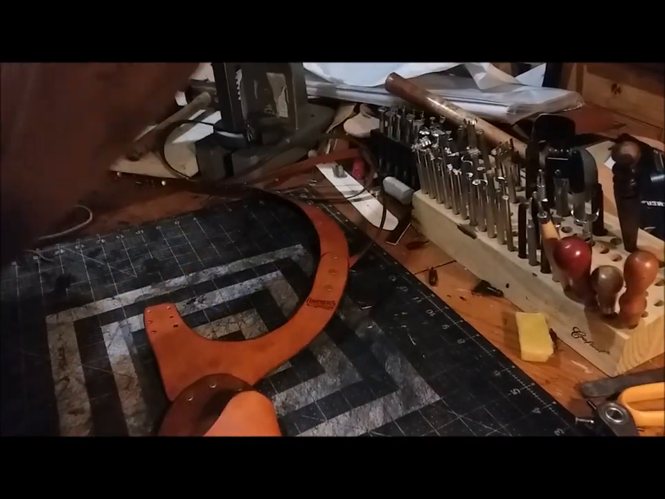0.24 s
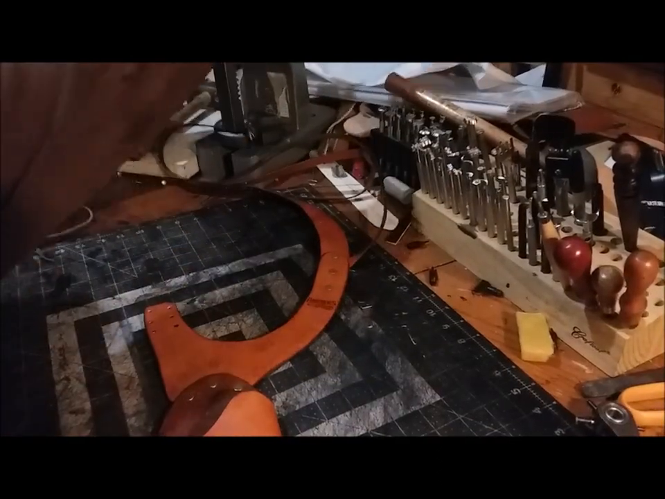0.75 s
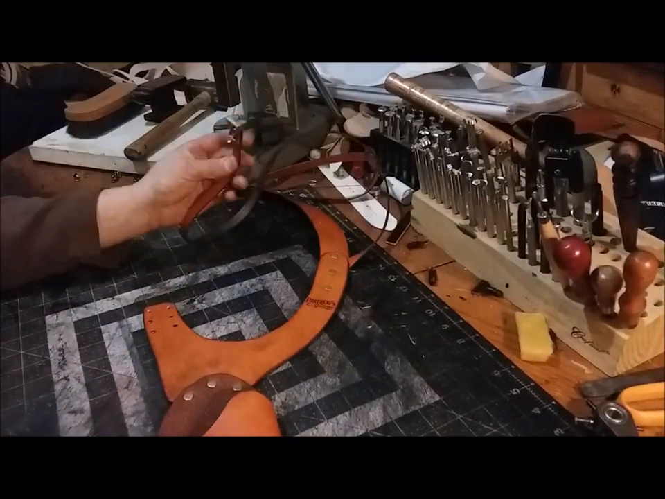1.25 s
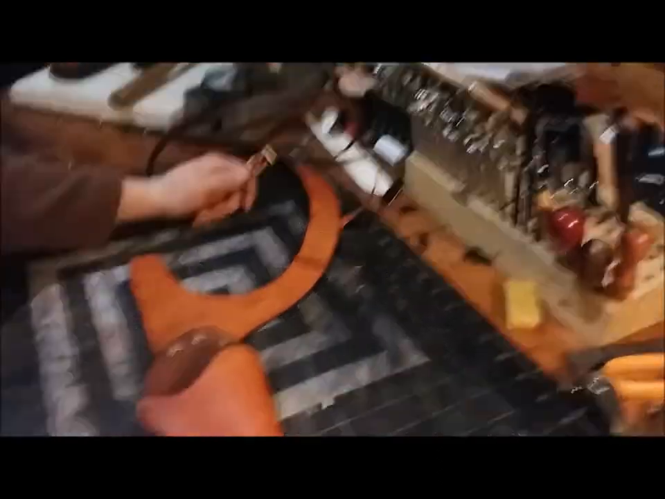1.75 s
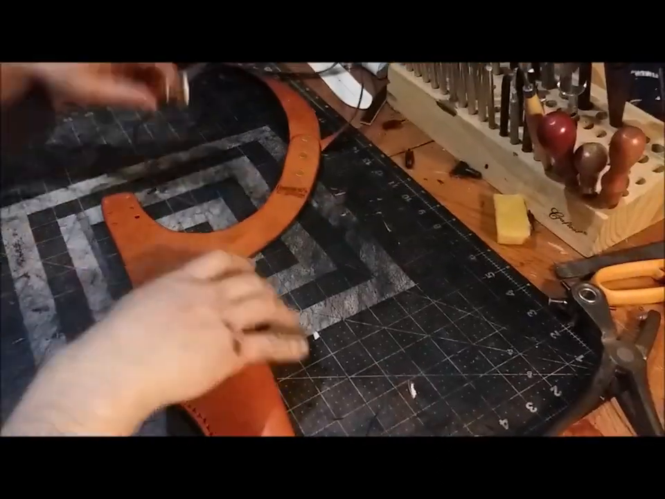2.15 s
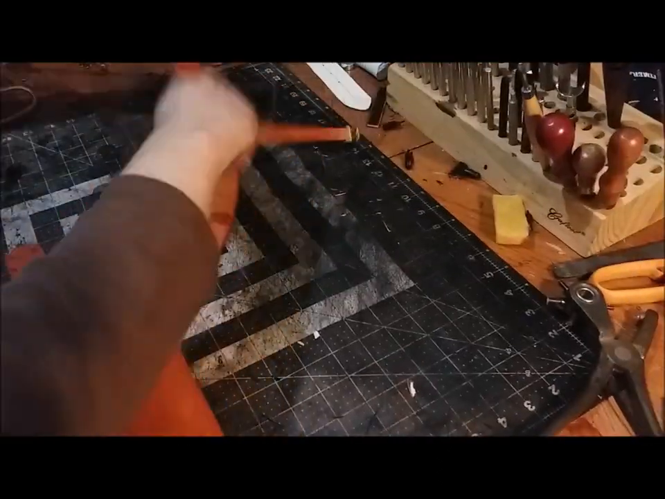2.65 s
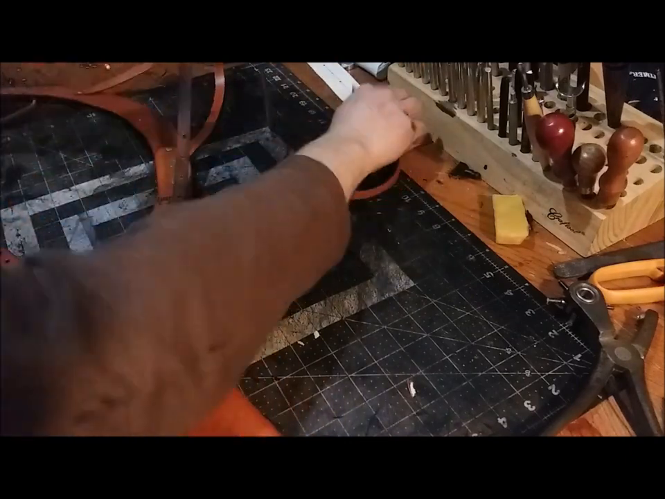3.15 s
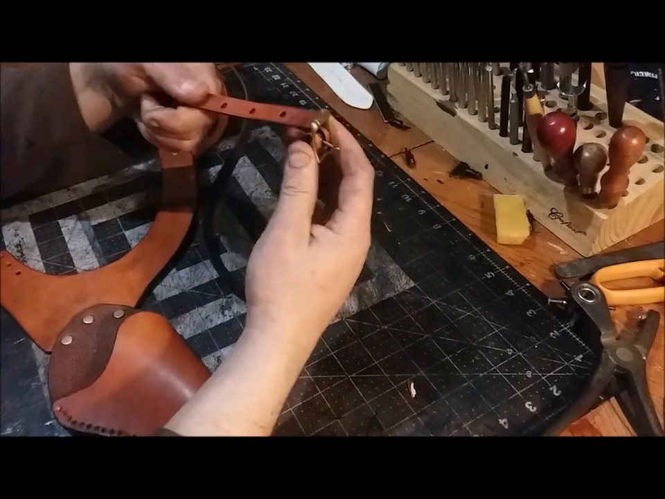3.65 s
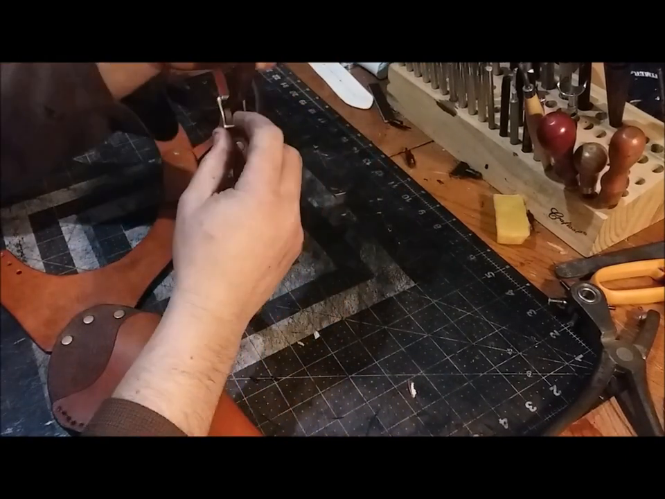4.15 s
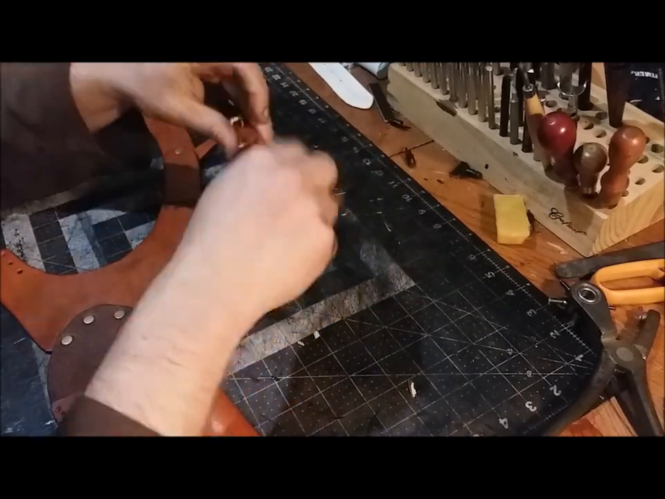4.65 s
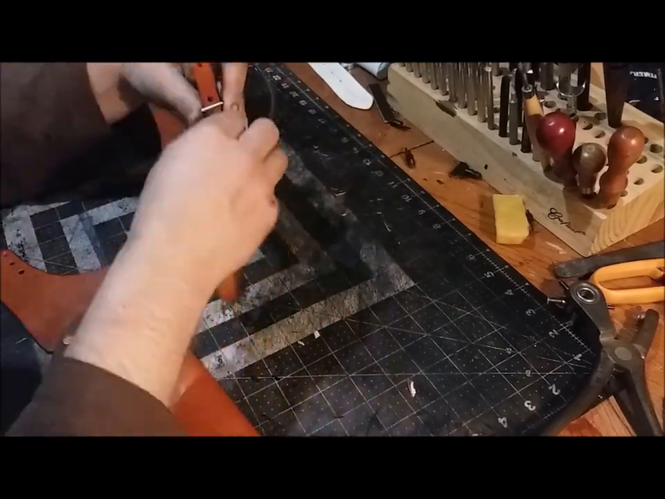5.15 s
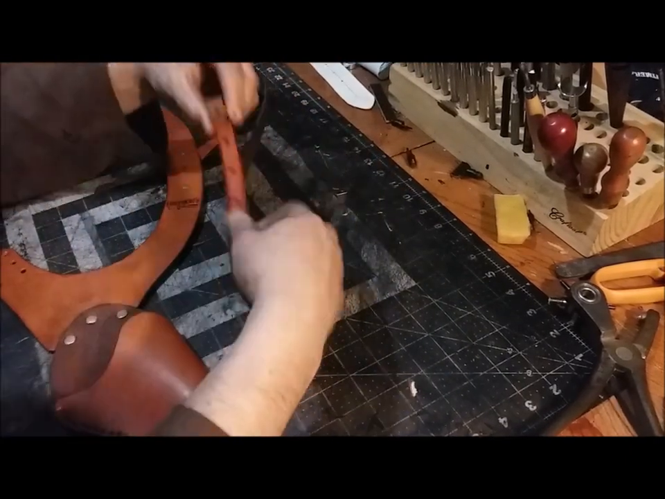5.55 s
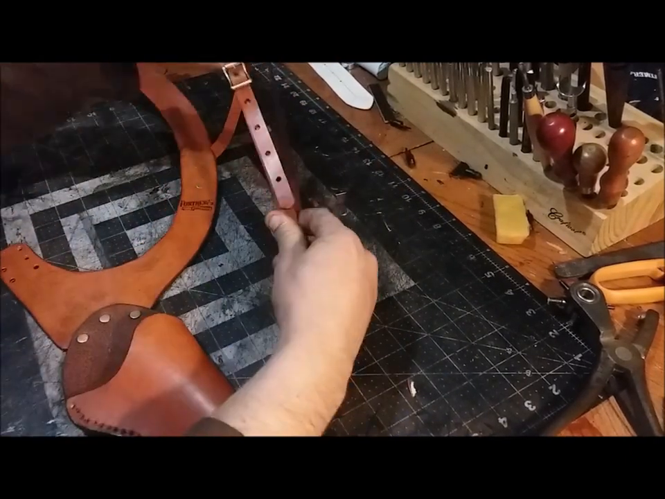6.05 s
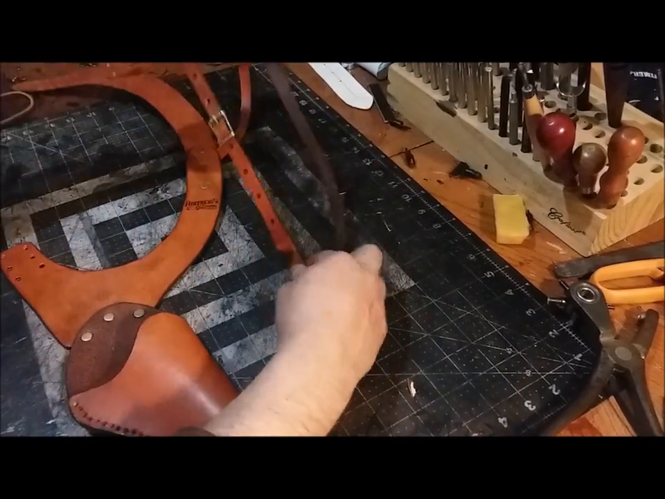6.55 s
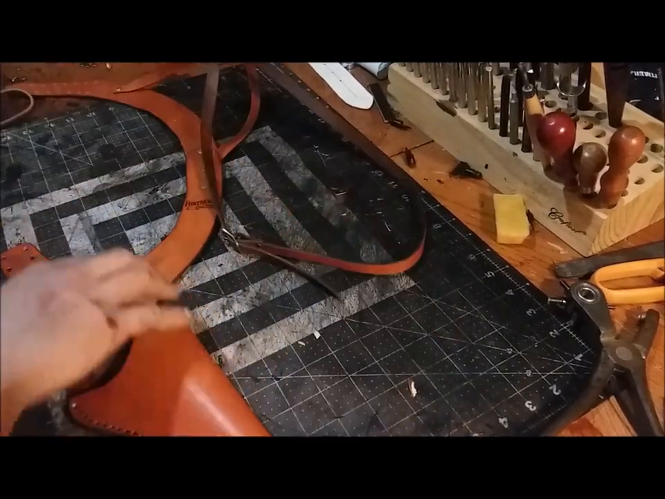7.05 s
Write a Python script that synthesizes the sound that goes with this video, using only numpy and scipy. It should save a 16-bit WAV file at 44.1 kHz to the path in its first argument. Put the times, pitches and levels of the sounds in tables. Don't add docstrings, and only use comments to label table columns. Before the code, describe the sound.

Quick leathercraft handling: scraped hollow hoots, a bright buckle slam, clustered clicks, then quiet strap fiddling and a final crisp double snap.

```python
import sys
import numpy as np
from scipy import signal
from scipy.fft import rfft, irfft, next_fast_len
from scipy.io import wavfile

SR = 44100
rng = np.random.default_rng(int(sys.argv[2]) if len(sys.argv) > 2 else 0)


def level_to_linear(level):
    exponent = np.asarray(level, float) / 20
    return 10 ** exponent


def dump_mix(stems):
    frames = np.atleast_2d(stems).T
    limited = np.clip(frames, -1, 1)
    pcm = np.round(limited * 32767).astype(np.int16)
    wavfile.write(sys.argv[1], SR, pcm)


N = 321930
SPLIT_HZ = 3700

# freq_hz, level_db_rms
HUM_LINES = [(236.9, -74), (516.8, -87.5), (1066, -88)]
# freq_hz, density_db_per_hz
ROOM_TONE = [(20, -14), (100, -13.5), (190, -17), (240, -5.5), (314, -11.5), (380, -8), (583, -10.5),
             (913, -21.5), (1050, -9), (1160, -23.5), (1690, -31), (2660, -26.5), (15200, -37),
             (16500, -54.5)]
# freq_hz, correlation
ROOM_ALIKE = [(60, 0.2), (130, -0.53), (290, 0.99), (640, 0.43), (1410, 0.92), (3100, -1.1), (6820, -0.13),
              (15000, 0.049)]
HANDLING_ALIKE = [(300, 0.36), (900, 0.93), (2500, 0.24), (4000, 0.06), (12000, 0.064)]

# time_s, rumble_db, rub_db, rustle_db
DRAG_LEVELS = [
    (0.0, -58.5, -63.5, -78),
    (2.03, -108.5, -66, -78),
    (2.46, -76, -68.5, -76),
    (7.3, -75, -64, -86.5),
]
# freq_hz, density_db_per_hz
DRAG_TONE = [(140, -42.5), (230, 0), (260, -8.5), (413, -5), (969, -8.5), (1100, -3), (1770, -7),
             (3800, -7.5), (8450, -13), (16000, -19)]

# freq_hz, width_hz, level_db
HOLLOW_MODES = [(1570, 70, 1), (1785, 90, -4), (1910, 90, -3), (2150, 120, -4), (2340, 110, -2),
                (2520, 140, -6.5), (4440, 300, -18), (6560, 300, -17), (10200, 350, -20), (11800, 300, -19)]
# time_s, level_db, half_length_s
STROKES = [
    (.868, -35.5, .017),
    (.897, -43, .012),
    (1.009, -38, .011),
    (1.034, -43, .014),
    (1.08, -57, .025),
    (1.153, -40.5, .013),
]

# freq_hz, level_db, t60_s
FRAME_MODES = [(1100, -22, .06), (2370, 0.5, .06), (4160, -8, .06), (5000, -7.5, .05), (6745, -3, .06),
               (7200, -6, .05), (7720, -8, .09), (8200, -2, .05), (8410, -6, .06), (9760, -8, .05),
               (10680, -6, .05), (11790, -14, .06), (13530, -14, .05)]
# freq_hz, level_db, t60_s
PRONG_MODES = [(4800, 5, .007), (6400, 1, .009), (8300, -8, .016), (9350, -1, .012), (13100, -5, .014),
               (15200, -10, .012)]
# time_s, left_peak_db, left_minus_right_db
PRONG_HITS = [
    (1.7774, -18, 9),
    (1.8012, -12, 22.5),
]

# time_s, peak_db, pitch_hz, left_minus_right_db
PINGS = [(0.0418, -34, 2740, -0.5), (0.0623, -30, 3030, -0.5), (0.1386, -24, 2260, -1.0),
         (0.3701, -46, 3360, 1.5), (0.7736, -24, 2600, -1.0), (0.7886, -29, 1940, 1.0),
         (0.8465, -28, 1860, 0.5), (0.8504, -26, 1580, 1.0), (0.9966, -33, 1560, 0.5),
         (1.0031, -25, 2100, -0.5), (1.0074, -29, 1570, 5), (1.1413, -34, 1690, 4.0),
         (1.1453, -28, 1560, 4), (2.0767, -36, 3640, 2.5), (2.5017, -19, 3580, 1.5),
         (2.5104, -27, 2960, -0.5), (2.576, -41, 3380, 1.5), (2.6125, -38, 3700, -1.0),
         (2.7477, -37, 3410, 2.0), (2.826, -30, 8600, 1.0), (2.8764, -31, 5740, 0.0),
         (2.9128, -24, 3460, 3.5), (2.9174, -25, 3760, -1.5), (2.9394, -25, 4170, -0.5),
         (2.9474, -28, 6300, 0.0), (2.9806, -22, 6910, 0.0), (3.0204, -28, 4960, 0.0),
         (3.1418, -32, 2280, 1.0), (3.1464, -30, 2220, 2.0), (3.1637, -28, 4950, -1.5),
         (3.2645, -45, 3450, 2.0), (3.3154, -24.5, 2390, -2), (3.3214, -22, 3800, -0.5),
         (4.138, -62, 3290, 1.5), (5.6634, -36, 4520, 1), (5.9344, -45, 1370, 1.0),
         (5.9464, -34, 5480, 0.0), (5.9793, -31, 4500, 1.5), (6.2043, -26.5, 4500, 1.5),
         (6.4358, -27, 1500, -1.5), (6.9292, -14, 4570, -2), (6.9344, -14, 5480, 2),
         (6.9671, -31, 1530, -1.0), (6.9774, -32, 4590, 0.0)]
# time_s, peak_db, pitch_hz, left_minus_right_db
TAPS = [(0.611, -42, 425, 0.0), (0.69, -41, 501, 4), (0.714, -43, 480, -0.5), (0.776, -33, 460, 0.0),
        (0.79, -23.5, 445, -3), (1.174, -39, 423, 0.5), (1.333, -33, 413, -0.5), (4.844, -38, 398, 1.5),
        (4.861, -41, 375, 1.5), (4.877, -45, 420, 1), (5.394, -53, 412, 2.0), (5.416, -44, 393, 1.5),
        (5.455, -49, 401, 2), (5.564, -50.5, 417, 0.5), (5.597, -46, 265, 0.5), (5.663, -54, 347, 2.0),
        (5.755, -58, 1070, 2), (5.811, -54, 412, 1.0), (5.854, -56, 417, 0.0), (5.883, -44, 337, -1),
        (5.934, -45, 1120, 0.5), (6.03, -55, 334, -2), (6.054, -50, 424, 0.0), (6.141, -54, 425, 0.0),
        (6.182, -59, 261, -2.0), (6.254, -57, 393, 0.5), (6.344, -61.5, 440, -0.5), (6.935, -32, 431, -0.5),
        (6.971, -44, 388, 0.5), (6.985, -47.5, 269, -1.0), (7.004, -58, 275, -1.0), (7.179, -47.5, 576, -5),
        (7.197, -43.5, 413, -1.0), (7.214, -51, 277, -2.0), (7.264, -48, 1080, -1.5)]

# freq_hz, level_db
BENCH_MODES = [(260, -7.5), (310, -7.5), (360, -4), (420, 0.5), (470, -4.5), (580, -7.5), (730, -17),
               (870, -15)]
# freq_hz, gain_db
HANDLING_DIP = [(20, -2), (110, -2), (165, -8), (240, 0), (16000, 0)]
# time_s, left_minus_right_db
PLACE = [(0, 0), (1.6, 0), (1.72, 1.5), (2.4, 2), (2.47, 1.5), (2.6, 0.5), (3.3, 0.5), (5, -0.5),
         (5.7, 0.5), (6.25, 1), (6.44, 0), (6.9, 0), (7.3, .5)]

# freq_hz, density_db_per_hz
REACH_TONE = [(600, -6), (1370, -9.5), (2070, 1), (3120, 0), (4300, -18.5), (6830, -17), (8620, -28),
              (10500, -27.5), (16000, -38)]
PULL_TONE = [(350, 19), (600, 4), (748, -17.5), (1980, -8.5), (2370, -9), (7830, -11.5), (9490, -17.5),
             (16000, -18.5)]
LIFT_TONE = [(350, -38), (600, -6), (1640, 6), (3940, -9), (4840, -7), (15100, -24), (16000, -28.5)]
DROP_TONE = [(600, -6.5), (1100, -5.5), (1390, -8), (3680, 0), (5790, 2), (10300, 0.5), (16000, -10)]
GATHER_TONE = [(350, -34), (600, -1), (2400, 3), (2760, -1), (3890, 0), (6030, -6.5), (7210, -3),
               (11300, -8), (16000, -22)]
THREAD_TONE = [(600, -29), (679, -12), (1100, -9.5), (1400, -15.5), (3040, -12.5), (4050, -7), (4580, -2.5),
               (5300, -9), (6830, -15.5), (9110, -13), (11000, -19.5), (16000, -28)]
RELEASE_TONE = [(350, -22), (600, 4.5), (801, -11.5), (1070, -6), (3120, -5), (5400, -4), (10600, -13.5),
                (16000, -20.5)]
SCRAPE_TONE = [(600, -15), (984, -7), (1430, -10), (1570, -1), (2300, -4), (2910, -9), (5560, -20.5),
               (6550, -17), (9240, -24), (11500, -19.5), (16000, -42.5)]
KNOCK_TONE = [(350, -27.5), (600, -1), (2440, -11), (3680, -16), (4280, -20.5), (16000, -31.5)]
JINGLE_TONE = [(600, 3.5), (858, 3.5), (1800, -5), (3100, -8), (3700, 4), (4400, -15), (6830, -8.5),
               (13400, -21), (16000, -32.5)]
SLAM_TONE = [(600, -23), (1040, -8), (1830, -10), (2440, 0), (3430, -8.5), (4400, -5), (10500, -4.5),
             (16000, -15.5)]
# start_s, contact_spectrum
STAGES = [(-1, REACH_TONE), (.53, KNOCK_TONE), (.76, PULL_TONE), (.82, SCRAPE_TONE), (1.3, KNOCK_TONE),
          (1.6, LIFT_TONE), (2.05, JINGLE_TONE), (2.43, SLAM_TONE), (2.49, DROP_TONE), (3.12, GATHER_TONE),
          (3.8, THREAD_TONE), (3.87, GATHER_TONE), (3.93, THREAD_TONE), (4.82, GATHER_TONE),
          (5.3, KNOCK_TONE), (5.63, THREAD_TONE), (6.4, GATHER_TONE), (6.55, THREAD_TONE),
          (6.85, RELEASE_TONE), (7, THREAD_TONE), (7.15, KNOCK_TONE), (7.22, RELEASE_TONE)]

# time_s, peak_db
TICKS = [(3.968, -64), (4.136, -68), (2.437, -42), (4.689, -61), (3.259, -56), (5.509, -65), (6.349, -67),
         (7.091, -57)]
# time_s, peak_db
SNAPS = [(0.0414, -42), (0.0623, -43), (0.1381, -32), (2.4472, -6), (2.4947, -33), (3.1637, -29),
         (3.3164, -25), (3.3217, -22), (5.9471, -47.5), (6.2057, -30.5), (6.7496, -29.5), (6.9291, -17.5),
         (6.9349, -18), (7.2429, -40), (7.2914, -54), (7.2964, -31)]
# peak_s, slap_db, thud_db, crackle_db
CRACKS = [(.043, -40.5, -90, -71), (.7761, -37, -44, -44), (1.7766, -61.5, -71, -50.5),
          (1.7825, -45, -49, -61.5), (1.7981, -37.5, -43.5, -60), (2.4477, -23, -49, -18.5),
          (2.5484, -55.5, -53, -48), (2.8263, -42.5, -44, -37), (2.9752, -59, -48, -28.5),
          (6.9298, -47, -51, -26.5), (6.9358, -34, -38, -25.5), (6.9675, -42.5, -55, -34.5)]
# peak_s, slap_db, thud_db, crackle_db
KNOCKS = [(.0629, -45.5, -90, -60), (.3712, -78, -65, -53), (.5803, -53, -48.5, -54.5),
          (1.336, -50, -37.5, -61.5), (2.0067, -59, -49, -58), (2.0783, -77, -92, -46),
          (2.4509, -30, -47.5, -18), (3.0331, -41, -57, -38.5), (3.101, -62, -62.5, -55),
          (3.144, -43.5, -55, -47), (2.915, -38, -48, -38.5), (3.5824, -42, -43.5, -44.5),
          (3.6892, -56, -51.5, -52), (4.394, -67.5, -71, -65), (3.895, -52, -48, -47.5),
          (5.4152, -55, -60, -55), (5.456, -58, -62, -62.5), (5.6199, -73, -63, -82.5),
          (5.812, -67, -66, -80), (5.785, -56, -70, -52.5), (6.202, -62, -84, -35), (2.468, -40, -60, -34),
          (6.4147, -69.5, -78, -56), (6.4362, -43, -41, -34.5), (6.5923, -48, -57, -41),
          (6.978, -49.5, -51.5, -40.5), (6.9415, -44, -55, -34), (3.022, -44, -59, -40),
          (7.183, -60, -56, -78)]
# peak_s, slap_db, thud_db, crackle_db
SLAPS = [(.1421, -33.5, -41.5, -37), (.9643, -59, -90, -72), (1.148, -37.5, -90, -42.5),
         (1.2127, -63.5, -62, -65), (1.5014, -87, -86, -61), (2.8797, -45, -48, -37.5),
         (3.319, -45, -57, -40.5), (3.4523, -66, -78, -69.5), (3.8285, -68.5, -71, -57.5),
         (4.7456, -77.5, -68, -64), (4.7939, -76, -80.5, -64), (5.3189, -79, -60, -74.5),
         (5.3486, -53, -61, -66.5), (5.6671, -57, -60, -43), (5.7578, -67, -81, -64),
         (5.894, -55, -58, -49), (5.9849, -53.5, -79, -44), (6.1447, -85.5, -64, -74),
         (6.25, -63, -63, -61), (6.287, -54.5, -68.5, -43), (6.889, -64, -69.5, -64),
         (7.055, -60.5, -71, -60)]
# peak_s, slap_db, thud_db, crackle_db
SWIPES = [(-.0073, -37.5, -36, -44), (.6573, -70, -60, -80), (.7913, -33, -46, -33),
          (.8518, -39, -44, -35.5), (1.181, -74, -43.5, -45.5), (1.4382, -75, -60.5, -82),
          (1.9209, -67.5, -65, -86), (2.9491, -41, -50.5, -35), (5.5709, -76, -64, -72),
          (5.9489, -47, -90, -49)]
# peak_s, slap_db, thud_db, crackle_db
SCUFFS = [(2.822, -53.5, -60, -49.5), (.8667, -35, -44, -35), (.9283, -49.5, -54.5, -72),
          (1.0098, -43.5, -58, -40), (1.1598, -42.5, -50.5, -42), (1.2537, -62, -57, -58),
          (1.8071, -57, -54.5, -85), (2.3112, -64, -62, -59.5), (2.5023, -38.5, -55, -37.5),
          (2.7, -52.5, -64, -48), (2.9855, -33.5, -54, -28), (3.1624, -47.5, -67, -44),
          (3.3896, -67.5, -66, -70), (3.5636, -68.5, -87, -61.5), (5.4967, -66.5, -60, -65.5),
          (5.6064, -62.5, -65, -67), (6.19, -64, -67, -57.5), (6.6011, -54, -64, -57.5),
          (6.6496, -62, -81, -54.5), (6.752, -56, -70, -45), (6.8126, -61, -72.5, -60),
          (7.2008, -55.5, -54.5, -62.5)]
# peak_s, slap_db, thud_db, crackle_db
RUBS = [(.045, -49, -51, -65.5), (.1188, -57, -70, -90), (.605, -57, -51.5, -56.5),
        (.803, -41.5, -42.5, -51.5), (1.0703, -57, -60, -89), (1.652, -80, -69, -78), (1.76, -63, -80, -73),
        (2.1813, -63.5, -75, -66.5), (2.3666, -68, -70, -60.5), (2.5761, -56, -66.5, -55),
        (2.6422, -47, -63, -46.5), (2.7367, -54, -60.5, -51.5), (2.852, -51.5, -67, -42.5),
        (2.9017, -49, -66, -56.5), (3.2533, -68, -69, -62.5), (5.4286, -77, -68, -69),
        (5.93, -58, -63.5, -56.5), (5.9707, -62, -62, -77), (6.955, -56.5, -60, -49),
        (7.0175, -76, -80.5, -63.5), (7.2565, -56.5, -65.5, -50), (7.2895, -74, -84, -48)]
# peak_s, slap_db, thud_db, crackle_db
SNAGS = [(.692, -58.5, -53.5, -80), (1.723, -52.5, -65, -59), (2.075, -53, -59, -48),
         (2.832, -44, -59, -35), (3.325, -41, -55, -32.5), (3.477, -58, -67.5, -57),
         (4.844, -46.5, -46.5, -41), (6.045, -63, -65, -58.5), (6.712, -59.5, -73, -49.5)]


def unit(x):
    return x / np.sqrt(np.mean(x ** 2) + 1e-20)


def along(points, hz):
    f, v = np.transpose(points)
    return np.interp(np.log(hz + 1), np.log(f + 1), v)


def curves(rows):
    s, *cols = np.transpose(rows)
    return [np.interp(np.arange(N) / SR, s, c) for c in cols]


def wobble(rate_hz, count=N):
    knots = rng.standard_normal(int(count * rate_hz / SR) + 4)
    return np.interp(np.arange(count) * rate_hz / SR, np.arange(len(knots)), knots)


def noise(tone, alike, lo_hz, hi_hz, count=N, peaky_db=0):
    m = next_fast_len(count)
    hz = np.fft.rfftfreq(m, 1 / SR)
    gain = level_to_linear(along(tone, hz))
    gain = gain / np.hypot(1, (lo_hz / (hz + 1)) ** 5) / np.hypot(1, (hz / hi_hz) ** 5)
    gain *= level_to_linear(peaky_db * np.interp(hz / 130, np.arange(200), rng.standard_normal(200)))
    turn = np.arccos(np.clip(along(alike, hz), -1, 1)) / 2
    white = rng.standard_normal((2, len(hz), 2)) @ [1, 1j]
    mid, side = irfft(white * gain * [np.cos(turn), np.sin(turn)], m)[:, :count]
    return unit(np.array([mid + side, mid - side]))


def shaped(x, shape):
    level = np.sqrt(np.mean(x * x, axis=0))
    return x * shape * np.linalg.norm(shape) / (np.linalg.norm(level * shape) + 1e-12)


def room():
    t = np.arange(N) / SR
    hum = np.zeros(N)
    for hz, db in HUM_LINES:
        level = level_to_linear(db + 4.0 + 0.9 * (hz / 240) * wobble(9.7))
        jitter_rad = 0.05 * (hz / 240) ** 1.8 * wobble(40)
        hum += level * np.sin(2 * np.pi * hz * t + jitter_rad)
    hiss_db = -73 + 0.77 * wobble(10)
    return hum + level_to_linear(hiss_db) * noise(ROOM_TONE, ROOM_ALIKE, 1.5, SR)


def drag():
    rumble_db, rub_db, rustle_db = curves(DRAG_LEVELS)
    slip_db = 1.2 * wobble(30) + 1.5 * wobble(300)
    rumble_db = rumble_db - 4.5 + 1.2 * wobble(30)
    rumble = level_to_linear(rumble_db) * noise(DRAG_TONE, HANDLING_ALIKE, 280, 640)
    rub = level_to_linear(rub_db - 12.0 + slip_db) * noise(DRAG_TONE, HANDLING_ALIKE, 600, SPLIT_HZ)
    rustle = level_to_linear(rustle_db + slip_db) * noise(DRAG_TONE, HANDLING_ALIKE, SPLIT_HZ, SR)
    return rumble + rub + rustle


def hollow_tool():
    t, hz = np.arange(N) / SR, np.fft.rfftfreq(N, 1 / SR)
    body = np.zeros(len(hz), complex)
    for k, (centre_hz, width_hz, db) in enumerate(HOLLOW_MODES):
        damping = 1j * hz * width_hz
        body += (-1) ** k * level_to_linear(db) * damping / (centre_hz ** 2 - hz * hz + damping)
    grit = noise([(600, 0), (9000, 0)], [(1000, 0.69)], 600, SR) * level_to_linear(3.3 * wobble(300))
    power = sum(level_to_linear(2 * db) * np.exp(-((t - s) / half_s) ** 2) for s, db, half_s in STROKES)
    return level_to_linear(-0.5) * np.sqrt(power) * unit(irfft(rfft(grit) * body, N))


def buckle_frame():
    hit_s, hit_db = 2.4478, -20
    out, t = np.zeros((2, N)), np.arange(SR // 12) / SR
    ring = np.zeros((2, len(t)))
    for hz, db, t60_s in FRAME_MODES:
        cycles = hz * t + rng.random() + [[0], [rng.normal(0, 1.2)]]
        ring += level_to_linear(db - 60 * t / t60_s) * np.sin(2 * np.pi * cycles)
    out[:, round(hit_s * SR):][:, :len(t)] = level_to_linear(hit_db) * np.minimum(t / .0008, 1) * ring
    return out


def buckle_prong():
    out, t = np.zeros((2, N + SR)), np.arange(SR // 20) / SR
    for s, db, pan_db in PRONG_HITS:
        ring_db = -14 + (db + 13) * .8
        ring = sum(level_to_linear(level_db + ring_db - 60 * t / t60_s) * np.sin(2 * np.pi * hz * t)
                   for hz, level_db, t60_s in PRONG_MODES)
        crack = 0.42 * level_to_linear(-60 * t / 0.0068) * np.diff(rng.standard_normal(len(t) + 1))
        crack = (crack + np.roll(crack, 1)) / 2
        gain = level_to_linear([[db - 2.5], [db - 6.5 - pan_db]])
        out[:, round(s * SR):][:, :len(t)] += gain * (ring + crack)
    return out[:, :N]


def damped_tones(rows, cycles, gain_db):
    out, t = np.zeros((2, N + SR)), np.arange(SR // 12) / SR
    for s, db, hz, pan_db in rows:
        detune, lag = rng.standard_normal(2)
        life = t * hz
        tone = np.sin(2 * np.pi * life + [[0], [0.44 * lag]])
        tone = tone + .3 * np.sin(2 * np.pi * life * (1.415 + .15 * detune))
        shape = np.minimum(life / 1.5, 1) * level_to_linear(-60 * life / cycles)
        gain = level_to_linear(db + gain_db + np.array([[pan_db / 2], [-pan_db / 2]]))
        out[:, round((s + .0008) * SR):][:, :len(t)] += gain * shape * tone
    return out[:, :N]


def edge_pings():
    return damped_tones(PINGS, cycles=27, gain_db=-4)


def bench_taps():
    return damped_tones(TAPS, cycles=20, gain_db=1.5)


def contact(tone, slap_db, thud_db, crackle_db, rise_s, t60_s):
    t = np.arange(SR // 8) / SR
    after = np.maximum(t - rise_s, 0)
    tail_cut = np.cos(np.pi / 2 * np.clip((after - .035) / .03, 0, 1)) ** 2
    swell = np.minimum(t / rise_s, 1) ** 2 * tail_cut
    grit = level_to_linear(1.6 * wobble(700, count=len(t)) + 1.4 * wobble(130, count=len(t)))
    ring = np.zeros((2, len(t)))
    for hz, db in BENCH_MODES:
        cycles = hz * rng.normal(1, 0.044) * t + rng.random() + [[0], [rng.normal(0, 0.057)]]
        ring += level_to_linear(db + rng.normal(0, 2.2)) * np.sin(2 * np.pi * cycles)
    thud_shape = swell ** 1.5 * np.minimum(t / 0.0036, 1) * level_to_linear(thud_db - 60 * after / (0.9 * t60_s))
    slap_shape = swell * level_to_linear(slap_db - 60 * after / t60_s)
    crackle_shape = swell * level_to_linear(crackle_db - 60 * after / (0.72 * t60_s))
    slap = noise(tone, HANDLING_ALIKE, 700, SPLIT_HZ, count=len(t), peaky_db=2.5)
    crackle = noise(tone, HANDLING_ALIKE, SPLIT_HZ, SR, count=len(t), peaky_db=2.5)
    return shaped(ring, thud_shape) + shaped(grit * slap, slap_shape) + shaped(grit * crackle, crackle_shape)


def straps():
    kinds = [  # rows, rise_s, t60_s
        (CRACKS, .002, .034), (KNOCKS, .004, .1), (SLAPS, .014, .085), (SWIPES, .029, .053),
        (SCUFFS, .036, .16), (RUBS, .045, .44), (SNAGS, .003, .245)]
    touches = [(*row, rise_s, t60_s) for rows, rise_s, t60_s in kinds for row in rows]
    touches += [(s + 0.0057, db - 15.5, -95, db - 6.0, .003, .07) for s, db in TICKS]
    touches += [(s + 0.00062, db - 18, -95, db - 4.5, .0004, .012) for s, db in SNAPS]
    out = np.zeros((2, N + 2 * SR))
    for s, slap_db, thud_db, crackle_db, rise_s, t60_s in touches:
        tone = [spectrum for start_s, spectrum in STAGES if start_s < s][-1]
        touch = contact(tone, slap_db, thud_db, crackle_db, rise_s, t60_s)
        out[:, SR + round((s - rise_s) * SR):][:, :touch.shape[1]] += touch
    return out[:, SR:SR + N]


def scene():
    still = room()
    pan_db, = curves(PLACE)
    handling = drag() + hollow_tool() + buckle_frame() + buckle_prong() + straps()
    handling = handling * level_to_linear([pan_db / 2, -pan_db / 2])
    handling = handling + edge_pings() + bench_taps()
    dip = level_to_linear(along(HANDLING_DIP, np.fft.rfftfreq(N, 1 / SR)))
    return irfft(rfft(handling) * dip, N) + still


def roll_off(x):
    return signal.sosfilt(signal.butter(12, 17170, fs=SR, output="sos"), x)


def record(dry):
    hz = np.fft.rfftfreq(N, 1 / SR)
    shelf = level_to_linear(-6.5)
    colour = level_to_linear(0.5) * (shelf + (1 - shelf) / np.hypot(1, (200 / (hz + 1)) ** 4))
    mix = irfft(rfft(dry) * colour * (hz < 16000), N)
    return roll_off(mix)


dry = scene()
out = record(dry)
dump_mix(out)
```